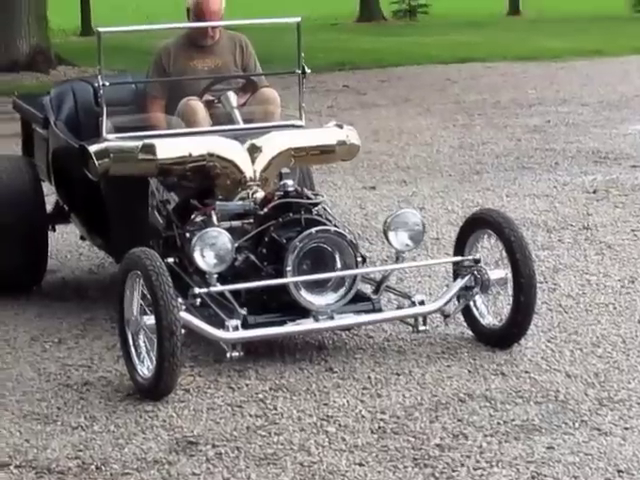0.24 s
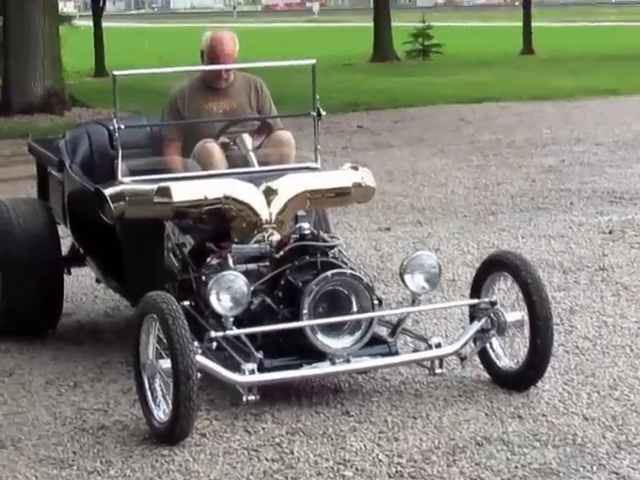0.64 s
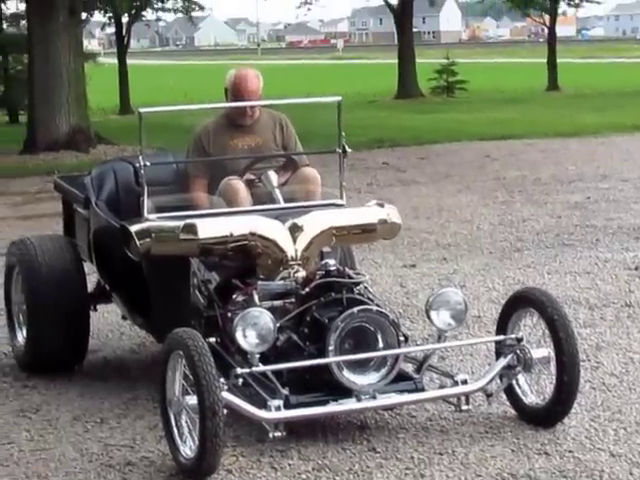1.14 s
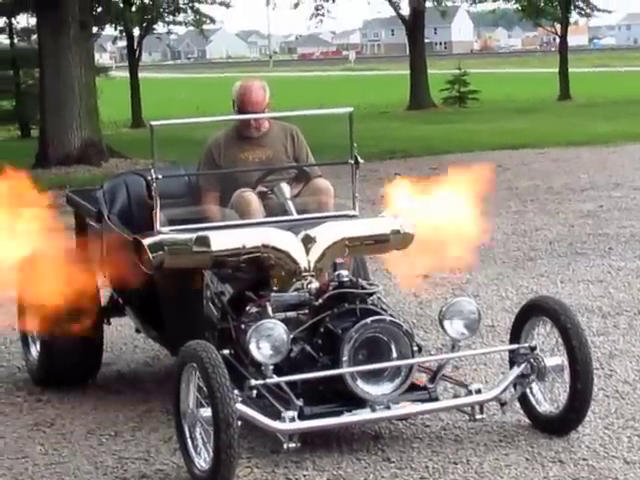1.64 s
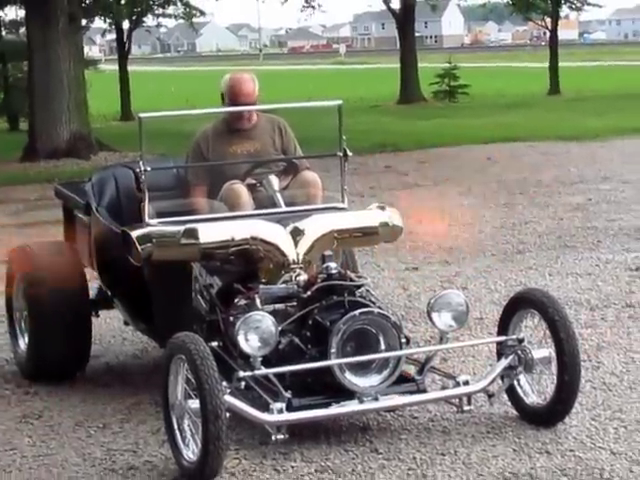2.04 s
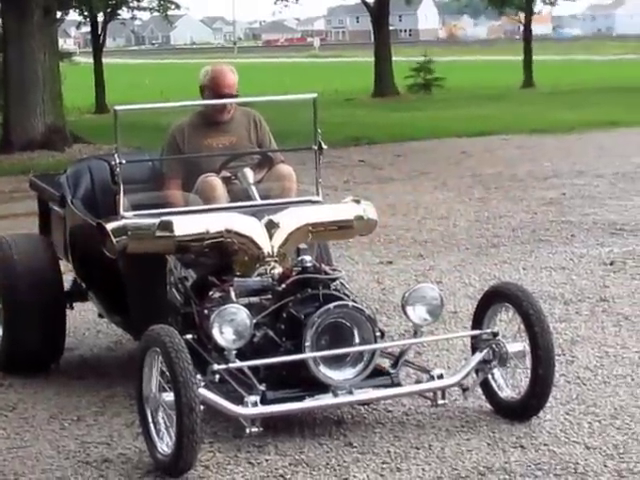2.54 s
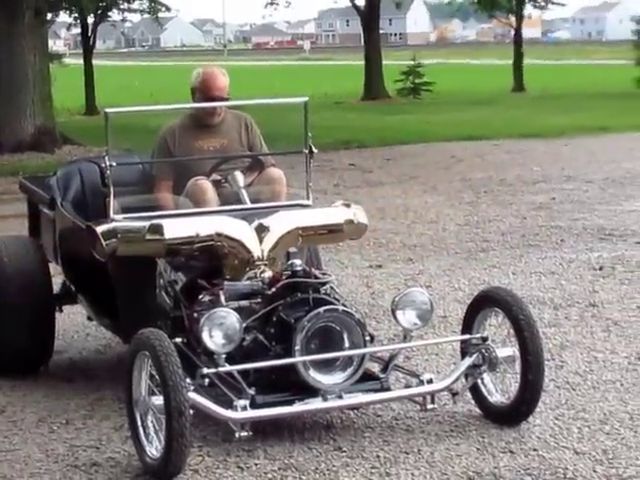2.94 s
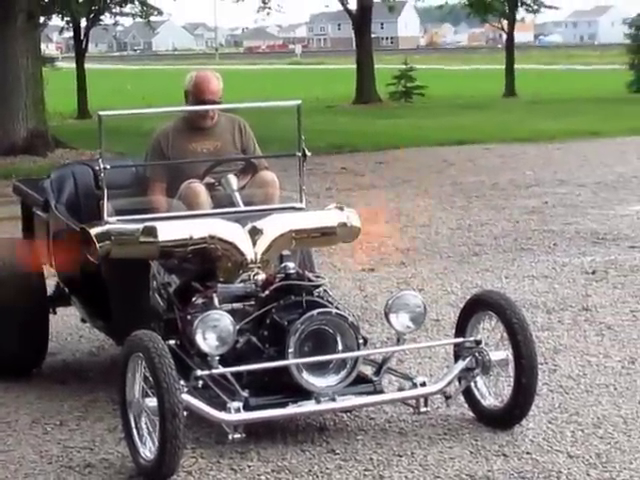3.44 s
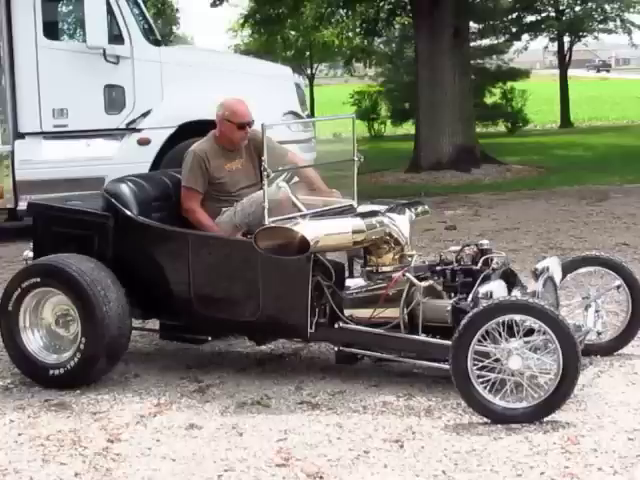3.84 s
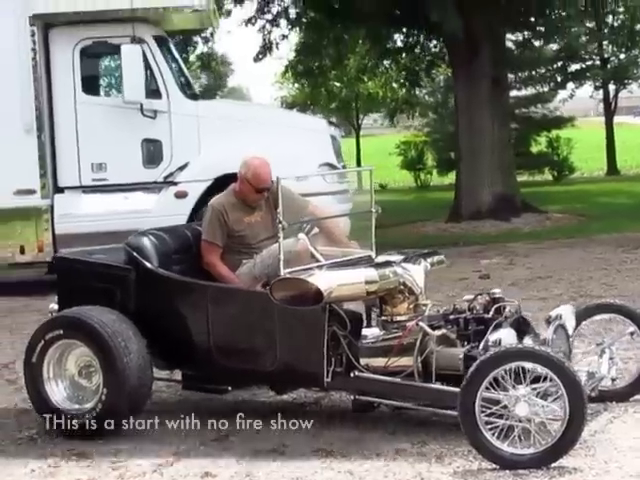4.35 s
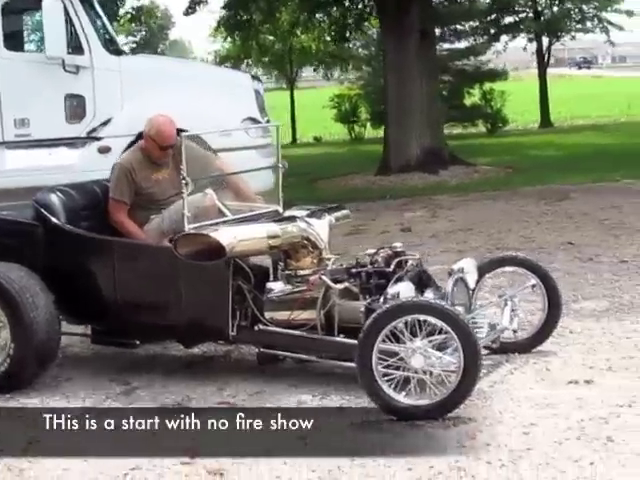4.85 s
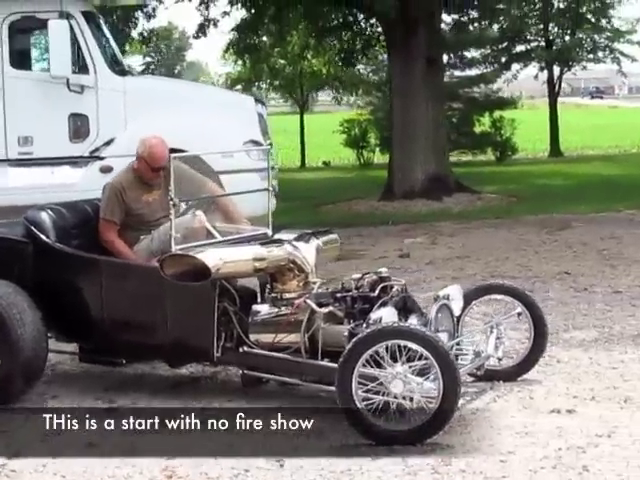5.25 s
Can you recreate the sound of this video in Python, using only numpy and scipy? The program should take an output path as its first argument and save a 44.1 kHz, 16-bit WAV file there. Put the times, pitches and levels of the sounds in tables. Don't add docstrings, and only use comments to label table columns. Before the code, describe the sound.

Turbine whine and booming exhaust, a ragged roar of flame overloading the microphone, then sudden outdoor quiet with switch clicks and a starter winding up.

```python
import sys
import numpy as np
from scipy import signal
from scipy.io import wavfile
from scipy.ndimage import uniform_filter1d

SR = 44100
rng = np.random.default_rng(int(sys.argv[2]) if len(sys.argv) > 2 else 0)


def magnitude_from_level(level_db):
    exponent = np.asarray(level_db, float) / 20
    return 10 ** exponent


def master_out(mix):
    frames = np.transpose(np.atleast_2d(mix))
    ceiling = np.clip(frames, -1, 1)
    pcm = np.round(ceiling * 32767).astype(np.int16)
    wavfile.write(sys.argv[1], SR, pcm)


N = 242991
T = np.arange(N) / SR
SIDE = np.array([[.5], [-.5]])
CHANGE_S = 3.932
LIGHT_S = 1.39
LOW_CUT_HZ = 98

# time in seconds, blade-passing tone in Hz,
# fireball outside the pipes from 0 to 1, thrust in dB.
ENGINE = [(0.0, 2725, 0, 4.5), (0.14, 2653, 0.2, 3), (0.42, 2542, 0.08, 2), (0.84, 2412, 0.12, 2.5),
          (1.14, 2327, 0.12, 2), (1.44, 2255, 0.18, 3.5), (1.56, 2270, 0.64, 6), (1.69, 2360, 0.98, 6),
          (1.96, 2404, 0.86, 9), (2.2, 2459, 0.67, 9), (2.4, 2487, 0.85, 8.5), (2.65, 2528, 0.05, 10.5),
          (2.95, 2579, 0.11, 8.5), (3.2, 2622, 0.21, 10.5), (3.4, 2657, 0.37, 10.5), (3.54, 2762, 0.83, 10),
          (3.68, 2777, 0.17, 12), (3.84, 2915, 0.19, 12.5)]
# frequency in Hz, then the value named in the note.
PORTS = [
    [(45, .97), (140, .99), (240, .96), (400, .78), (1000, .7), (2400, .85), (6000, .85), (12000, .82)],
    [(45, -1.0), (80, -.78), (140, -.48), (240, -.33), (650, -.25), (1600, -.15), (2400, .5), (3600, .15), (8000, -.05)],
    [(45, 4), (140, .4), (400, -1), (1000, -1), (1600, -3), (2400, -2.5), (3600, .3), (6000, .4), (8000, 4), (11000, -1)],
]
YARD_PORTS = [
    [(45, 0.38), (140, 0.49), (240, 0.75), (1000, 0.45), (2400, 0.49), (6000, 0.33)],
    [(45, -6), (80, 1), (140, 0.5), (400, 0), (1000, -0.5), (5000, -1)],
    PORTS[2],
]

# time in seconds, pitch in Hz.
BOOM_HZ = [(0, 152.6), (.14, 138.7), (.3, 144.9), (.46, 151.6), (.62, 150.4), (.8, 138.8), (.86, 142.9),
           (.92, 159.3), (1.0, 138.8), (1.24, 158.2), (1.4, 149), (1.5, 130), (2.5, 150.2), (2.65, 155.5),
           (2.8, 143.5), (2.97, 152.1), (3.2, 135), (3.9, 148)]
# time in seconds, extra level in dB, half length in seconds.
SURGES = [(.13, 13, 0.02), (.2, 8.5, 0.02), (0.244, 14, 0.0051), (.36, -18, 0.017), (.463, 11, 0.028),
          (.52, -5, 0.065), (.6, 4.5, 0.047), (.66, -6.5, 0.029), (.78, 4.5, .021), (.85, 7.5, 0.019),
          (0.921, 7.5, 0.02), (.97, 0, 0.03), (1.01, 3.5, .021), (1.05, -0.5, 0.029), (1.15, -2.5, 0.041),
          (1.19, 8.5, 0.0069), (1.248, 5.5, .03), (1.31, 3.5, 0.022), (1.39, 4.5, 0.0073),
          (1.47, 12, 0.012), (1.505, 22.5, 0.0082), (2.0, 16, 0.013), (2.21, 9, 0.019), (2.28, 10, 0.036),
          (2.65, -3, 0.024), (2.74, -13, 0.029), (2.92, -0.5, 0.061), (3.05, -5.5, 0.044), (3.15, 0.5, .04),
          (3.79, -26, 0.039)]
# frequency in Hz, width in Hz, level in dB.
DUCT = [(251, 31, 5), (414.6, 48, 0), (655, 87, -1.5), (944, 170, -5.5)]

# frequency in Hz, level in dB.
INTAKE = [
    [(2250, -26.5), (2400, -29.5), (2500, -30), (2590, -29.5), (2670, -30), (2760, -26), (2920, -22.5)],
    [(4500, -31), (4650, -24.5), (4850, -26.5), (5050, -23.5), (5280, -25), (5400, -24.5), (5830, -22)],
    [(6750, -42.5), (7100, -39), (7400, -25.5), (7600, -27), (7850, -27.5), (8100, -22), (8750, -24.5)],
    [(11300, -43.5), (11800, -41.5), (12250, -40.5), (12550, -41.5), (13000, -41), (13600, -41), (14500, -39)],
]
# time in seconds, extra level in dB, half length in seconds.
WAVERS = [(.105, -8, 0.038), (.17, -7, 0.026), (.29, 3, 0.11), (.39, 0.5, 0.046), (.55, -10, 0.049),
          (.7, -4.5, 0.11), (.82, -1, .04), (1.15, -4.5, 0.25), (.97, -2, .06), (1.4, 1, 0.059),
          (2.95, -3, 0.032), (3.25, -6, 0.055), (3.43, 8, 0.018), (3.5, 5.5, 0.032), (3.78, 8, 0.033)]
# time in seconds, extra level in dB, half length in seconds.
FALTERS = [(.235, -13, 0.0054), (.745, -14, .014), (.855, -9, 0.0086), (2.4, -0.5, 0.098),
           (2.56, -5, 0.057), (2.65, 1, .05), (2.75, -5.5, 0.045), (2.88, 0, .05), (3.0, -3, 0.17),
           (3.2, -6.5, 0.057), (3.35, -3.5, 0.048), (3.67, -4, 0.025), (3.86, -1.5, .04)]
# time in seconds, extra level in dB, half length in seconds.
GLINTS = [
    [(.1, 3, 0.036), (.6, -1.5, 0.075), (.98, -2, .05), (2.62, 6, 0.18), (2.85, -2.5, 0.056), (3.2, -1.5, 0.054), (3.7, -0.5, 0.097)],
    [(.3, 11, 0.064), (.55, 2, .06), (.72, 3, .05), (.88, -9, 0.048), (1.05, 0, .08), (1.3, -16, 0.11), (1.8, 5, 0.072), (3.2, 4, 0.091)],
]
# time in seconds, eddy strength in dB, half length in seconds.
CALM = [(1.8, -3, .05), (2.55, -7, .06), (2.65, -8, .06), (2.84, 1, .07), (3.05, -4, .05), (3.13, 1.5, .03),
        (3.3, -5, .035), (3.52, 2, .05), (3.7, -4, .04), (3.8, 1.5, .06)]
# time in seconds, peak level in dB, extra level in dB.
BURSTS = [(1.5823, -18, 11), (1.6162, -15, 7), (1.6511, -16, 2), (1.6835, -15, 4), (1.7163, -14, 8),
          (1.7496, -15, 1), (1.8187, -21, -2), (1.8442, -13, 0), (1.8677, -16, 4), (1.9, -16, 1),
          (1.93, -14, 3.5), (1.9584, -14, 3), (2.156, -10, 5), (2.185, -8, 11), (2.2056, 6, 10),
          (2.2547, -10, -3), (2.2862, -10, 5), (2.3256, -8, 10), (2.359, -8, 3), (2.377, -10, 2),
          (2.3949, -10, 2), (2.4135, -10, -3), (2.4372, -8, 9), (2.4902, -15, 0), (2.5101, -10, -2),
          (2.756, -11, 3), (2.8239, -13, -4), (2.8603, -13, 7), (2.9696, -11, 3), (3.0724, -11, -5),
          (3.357, -10, 6.5), (3.3931, -11, 2), (3.4109, -9, 3), (3.4335, -8, 11), (3.5064, -7, 5),
          (3.5436, -8, 9), (3.5643, -7, 9), (3.6156, -8, 3), (3.7145, -9, 3)]

# frequency in Hz, level in dB per Hz.
RUMBLE = [(12, -41), (20, -18), (57, 2.5), (118, 4), (216, -0.5), (249, -12), (304, -14), (330, -17.5),
          (430, -25), (730, -120)]
# time in seconds, extra level in dB, half length in seconds.
THUMPS = [(.6, -4, 0.3), (1.25, 2, .05), (1.39, 4, 0.032), (1.5, 3, 0.033), (1.57, -1.5, 0.04),
          (2.45, -1.5, 0.042), (3.35, 1.5, 0.12), (3.62, -2.5, 0.093), (1.7, -5.5, 0.045), (2.0, 2.5, 0.23),
          (2.26, 0, 0.095), (2.79, 8.5, 0.057), (3.07, 3.5, 0.034), (3.84, 1, 0.041)]
# time in seconds, extra level in dB, half length in seconds.
DEEP_GUSTS = [(.45, -6, .08), (.7, -7, .1), (1.0, -14, .1), (1.35, -9, .1), (1.56, 5, 0.066),
              (1.7, 7, 0.053), (1.86, -5.5, 0.043), (2.1, 2, .1), (2.3, 5.5, 0.059), (2.9, 3, 0.059),
              (3.05, -5, .05), (3.25, -2, 0.12), (3.55, 6, 0.096), (3.7, -12, 0.051), (3.85, 9, 0.048)]
# frequency in Hz, level in dB per Hz.
ROAR = [(120, -67), (220, 20), (330, -3), (800, -3.5), (1150, -1), (1600, 5.5), (2300, -3), (3000, 2.5),
        (5000, -143)]
# frequency in Hz, level in dB per Hz.
HISS = [(1500, -4), (2600, 8.5), (3700, 3), (6000, 3), (12000, -2), (13600, -1), (14600, -20), (15700, -14)]
# time in seconds, peak level in dB.
POPS = [(1.5, -29), (1.531, -30), (1.7075, -32), (1.7793, -32), (1.999, -19), (2.0537, -21), (2.1713, -22),
        (2.2057, -12), (2.253, -31), (2.275, -28), (2.314, -27), (2.357, -28), (2.008, -24), (2.042, -29),
        (1.745, -30), (1.766, -27), (3.4415, -42), (3.5043, -32)]
# frequency in Hz, level in dB per Hz.
POP_TONE = [(300, 16.5), (1500, -4), (4000, 2.5), (9000, 4.5), (14000, -7), (16000, -12)]

# frequency in Hz, level in dB per Hz.
YARD = [(12, -30.5), (20, 11), (85, 4), (186, -3.5), (393, -14), (465, -8), (550, -18), (614, -15.5),
        (1460, -16.5), (12400, -42.5), (15500, -46)]
# time in seconds, peak level in dB, ring pitch in Hz,
# time to fall 60 dB in seconds, left-right difference in dB.
CLICKS = [(3.9513, -21, 6830, 0.021, 0), (3.994, -28.5, 4600, 0.013, 6), (4.015, -32, 4630, 0.015, 0.5),
          (4.059, -20, 5030, 0.0051, 3), (4.123, -36, 5100, 0.012, 1.5), (4.2344, -40, 5080, 0.012, -2.0),
          (4.2894, -52, 5390, 0.012, -0.5), (4.5268, -34, 5000, 0.056, 3), (4.589, -33, 3500, 0.013, -4),
          (4.6027, -28.5, 9500, 0.012, 3), (4.603, -39, 4000, .01, 0), (4.654, -44, 5000, .012, 0),
          (4.88, -26, 13000, .01, -5), (4.871, -28, 2790, 0.023, 0), (4.88, -13.5, 7900, 0.012, -8),
          (4.8805, -21, 3400, 0.0099, -6), (4.911, -21, 3000, 0.03, 3), (4.913, -22, 8800, 0.03, 3),
          (4.887, -28.5, 6470, 0.11, 0), (5.1594, -41, 5420, 0.012, 0.5), (4.7316, -20, 9050, 0.026, 0),
          (4.691, -42, 6000, .012, 0), (4.864, -36, 7500, .05, 0)]
# time in seconds, peak level in dB, left-right difference in dB.
LEVER = [
    (4.4585, -12, .5),
]
# frequency in Hz, level in dB, time to fall 60 dB in seconds.
LEVER_MODES = [(975, -2.5, 0.021), (1750, 9.5, 0.011), (2080, -2, 0.014), (2910, -14, 0.031),
               (3400, -7, 0.018)]
# time in seconds, peak level in dB, pitch in Hz, time to fall 60 dB in seconds.
REBOUND = [
    (4.4982, -28, 3250, .018),
    (4.501, -28, 1660, 0.022),
]
# time in seconds, level in dB.
PUFF = [
    (4.731, -35),
    (4.733, -33),
    (4.829, -49.5),
    (4.855, -53),
]
# frequency in Hz, level in dB per Hz.
PUFF_TONE = [(1180, -57), (2000, -31), (2590, -11), (3040, -4), (3550, -20), (3740, -8), (5650, 1),
             (6480, -7), (8970, -4), (15500, -18)]
# time in seconds, peak level in dB, left-right difference in dB.
RELAY = [
    (4.9152, 0.5, -1.5),
]
# frequency in Hz, level in dB, time to fall 60 dB in seconds.
RELAY_MODES = [(1000, -25, 0.044), (1220, -6, .07), (1930, 9.5, 0.024), (2770, 10.5, 0.024),
               (4390, 5, 0.026), (4840, 5, 0.02), (7100, -12, .1), (8560, -5.5, 0.062), (12100, -16, .07)]
# time in seconds, teeth per second in Hz.
MOTOR = [
    (4.92, 44.4),
    (5.22, 310),
    (5.33, 405),
    (5.4, 472),
    (5.51, 573),
]
# frequency in Hz, width in Hz, level in dB.
HOUSING = [(367, 16, -4.5), (600, 57, -8.5), (813, 17, 3.5), (948, 31, -2), (1280, 96, -9),
           (1840, 10.5, 3.5), (1984, 27, 1), (2150, 46, -8), (2410, 40, -20), (2695, 34, -2.5),
           (3000, 30, -31), (3600, 33, -39), (4160, 49, -17)]
# frequency in Hz, level in dB per Hz.
BRUSH = [(590, -17), (1000, -14), (1550, -12), (1950, -4.5), (3040, -10.5), (6570, -16), (9370, -12.5),
         (12500, -24.5), (14000, -34), (15500, -50)]


def evened(x):
    return x / np.sqrt(np.mean(abs(x) ** 2) + 1e-20)


def read(points, hz):
    f, value = np.transpose(points)
    return np.interp(np.log(hz + 1), np.log(f + 1), value)


def curves(rows):
    s, *columns = np.transpose(rows)
    return [np.interp(T, s, c) for c in columns]


def swells(rows):
    t = T[::64]
    total = sum(db * np.exp(-((t - s) / half) ** 2) for s, db, half in rows)
    return np.interp(T, t, total)


def add(mix, s, sound):
    part = mix[:, round(s * SR):][:, :sound.shape[1]]
    part += sound[:, :part.shape[1]]


def chance(hz, channels=1):
    z = rng.standard_normal((channels, N // 16 + 2, 2)) @ [1, 1j]
    r = np.exp(-2 * np.pi * hz * 16 / SR)
    slow = evened(signal.lfilter([1], [1, -2 * r, r * r], z))
    return np.array([np.interp(T, np.arange(len(v)) * 16 / SR, v) for v in slow])


def noise(spectrum_db, ports, patchy_db, size=1024, in_yard=False):
    first = 39 * SR // 10 if in_yard else 0
    length = N - first if in_yard else 4 * SR
    frames, hz = 4 * length // size + 5, np.fft.rfftfreq(size, 1 / SR)
    a, b, c, d, patches = rng.standard_normal((5, len(hz), frames))
    patches = uniform_filter1d(patches, size=12, axis=0)
    patches = evened(uniform_filter1d(patches, size=10, axis=1))
    same, lead, pan_db = (read(p, hz)[:, None] for p in ports)
    same = np.clip(same, 0, 1)
    left = a + 1j * b
    right = same * left + np.sqrt(1 - same ** 2) * (c + 1j * d)
    right = right * np.exp(-1j * lead)
    z = np.array([left * magnitude_from_level(pan_db / 2), right * magnitude_from_level(-pan_db / 2)])
    z *= magnitude_from_level(spectrum_db(hz)[:, None] + patchy_db * patches)
    x = signal.istft(z, nperseg=size, noverlap=3 * size // 4)[1]
    return np.pad(evened(x[:, :length]), ((0, 0), (first, N - first - length)))


def port(hz):
    return magnitude_from_level(SIDE * read(PORTS[2], hz)) * np.exp(1j * SIDE * read(PORTS[1], hz))


def resonances(modes, hz):
    return sum(magnitude_from_level(db) / np.sqrt(1 + (2 * (hz - f) / width) ** 2) for f, width, db in modes)


def ring(modes, rise_s):
    t = T[:9000]
    x = sum(magnitude_from_level(db - 60 * t / t60) * np.sin(2 * np.pi * (hz * t + rng.random())) for hz, db, t60 in modes)
    x *= np.minimum(t / rise_s, 1)
    return x / abs(x).max()


def crack(hz, t60):
    t = T[:9000][:round(1.5 * t60 * SR) + 200]
    band = signal.butter(2, [hz / 1.5, min(1.4 * hz, .45 * SR)], "band", fs=SR)
    x = signal.lfilter(*band, rng.standard_normal(len(t)) * magnitude_from_level(-60 * t / t60))
    return x / abs(x).max()


def duct_boom():
    hz = curves(BOOM_HZ)[0]
    turn = 2 * np.pi * np.cumsum(hz) / SR
    sway = chance(15)
    sway = sway * abs(sway) ** -.6
    sway = uniform_filter1d(sway.view(float).reshape(1, N, 2), size=330, axis=1) @ [1, 1j]
    tone = evened((sway * port(hz) * np.exp(1j * turn)).real)
    ratio = 1.36
    upper = chance(13.5) * port(ratio * hz) * np.exp(1j * ratio * turn)
    tone = tone + magnitude_from_level(-11) * evened(upper.real)
    fireball = curves(ENGINE)[1]
    return tone * magnitude_from_level(-12 - 29.5 * fireball + swells(SURGES))


def blade_whine(boom):
    hz, fireball, _ = curves(ENGINE)
    lit = np.clip((T - LIGHT_S) / 0.16, 0, 1)
    cold, hot, extra = .12, .68, .12
    turbulence = cold + lit * (hot - cold + extra * fireball) * magnitude_from_level(swells(CALM))
    share = np.clip(turbulence, 0, 1)

    loss_db = lit * -12 * np.exp(-abs(T - LIGHT_S) / 0.24)
    first_db, second_db, third_db, fifth_db = (read(p, k * hz) + loss_db for k, p in zip((1, 2, 3, 5), INTAKE))
    levels_db = [first_db + swells(WAVERS),
                 second_db + swells(FALTERS),
                 third_db + swells(GLINTS[0]),
                 (second_db + fifth_db) / 2 - 6,
                 fifth_db + swells(GLINTS[1]),
                 fifth_db - 4 - 5 * turbulence]

    flutter = evened((chance(9)[0] * np.exp(2j * np.pi * 57.6 * T)).real)
    turn = 2 * np.pi * np.cumsum(hz) / SR
    turn = turn + 0.34 * share * flutter + 0.14 * np.tanh(boom[0] / 0.26)
    turn = turn + .22 * share * chance(130)[0].real * np.sqrt(2)
    throb_db = lit * (2.5 + 3.5 * fireball) * np.minimum(np.roll(flutter, 150) - .5, .5)
    throb_db = throb_db + swells([(s + 0.0036, db, 0.004) for s, _, db in BURSTS]) - 1

    out = np.zeros((2, N))
    for k, db in enumerate(levels_db, 1):
        scattered = .45 * chance(45 + 12 * k) + .89 * chance(120 + 50 * k)
        sway = np.sqrt(1 - share ** 2) + (share + .45 * (k > 4)) * scattered
        sway = sway + (.32 + .06 * lit) * chance(22, channels=2)
        gain = np.sqrt(2) * magnitude_from_level(db + 3.0 + throb_db * min(k + 1, 4) / 4)
        out += gain * (sway * port(k * hz) * np.exp(1j * k * turn)).real
    return out


def accessory_gear():
    shaft = 2 * np.pi * np.cumsum(curves(ENGINE)[0]) / SR
    return np.sin(.5655 * shaft) * magnitude_from_level(-42.0 - 1.38 * T) * (T < LIGHT_S)


def flame_rumble():
    fireball = curves(ENGINE)[1]

    def tone_db(hz):
        return read(RUMBLE, hz) + 10 * np.log10(1 + (LOW_CUT_HZ / (hz + 20)) ** 2)

    rumble = noise(tone_db, PORTS, 2.6, size=4096)
    deep = signal.lfilter(*signal.butter(1, 75, fs=SR), rumble)
    rumble = rumble + deep * (magnitude_from_level(-12 + 14.5 * fireball + swells(DEEP_GUSTS)) - 1)
    hollow = signal.lfilter(*signal.butter(1, (150, 225), "band", fs=SR), rumble)
    rumble = rumble - .6 * fireball * hollow
    ducked_db = 0.19 * np.maximum(swells(SURGES), 0) * (T < LIGHT_S)
    rumble_db = -18 + 2.5 * fireball + swells(THUMPS) - ducked_db
    overtones = noise(lambda hz: 40 * np.log10(resonances(DUCT, hz)), PORTS, 1.5, size=4096)
    return rumble * magnitude_from_level(rumble_db) + overtones * magnitude_from_level(-32.0 + 0.2 * T)


def roar_and_hiss():
    _, fireball, thrust_db = curves(ENGINE)
    roar = noise(lambda hz: read(ROAR, hz), PORTS, 0.46, size=2048)
    hiss = noise(lambda hz: read(HISS, hz), PORTS, 0.24)
    gust = magnitude_from_level((.5 + fireball) * chance(45).real)
    return (roar * magnitude_from_level(-37 + thrust_db) + hiss * magnitude_from_level(-34 + 0.79 * thrust_db)) * gust


def flame_pops():
    flash, t = np.zeros((1, N)), T[None, :3000]
    for s, db in POPS:
        add(flash, s, magnitude_from_level(db - 60 * t / 0.07) + magnitude_from_level(db + 4 - 60 * t / 0.016))
    return flash * noise(lambda hz: read(POP_TONE, hz), PORTS, 3.3, size=512)


def quiet_yard():
    air = noise(lambda hz: read(YARD, hz), YARD_PORTS, 1.0, size=2048, in_yard=True)
    return air * magnitude_from_level(-30 + 0.43 * chance(2.0).real)


def switch_clicks():
    out = np.zeros((2, N))
    for s, db, hz, t60, pan_db in CLICKS:
        add(out, s, crack(hz, t60) * magnitude_from_level(db + SIDE * np.clip(pan_db, -3, 3)))
    return out


def with_ground_scatter(knocks):
    t = T[:6000]
    scatter = rng.standard_normal((2, 6000)) * magnitude_from_level(-60 * t / .2) * (t > .004)
    scatter = signal.lfilter([1], [1, -.45], scatter)
    scatter = scatter / np.linalg.norm(scatter[0])
    return knocks + magnitude_from_level(-8) * signal.fftconvolve(knocks, scatter, axes=1)[:, :N]


def lever_knock():
    out = np.zeros((2, N))
    for s, db, pan_db in LEVER:
        pan = SIDE * pan_db
        add(out, s - .0005, ring(LEVER_MODES, 0.0014) * magnitude_from_level(db + pan))
        add(out, s - .001, crack(7300, 0.09) * magnitude_from_level(db - 19 + pan))
        add(out, s, crack(3800, 0.53) * magnitude_from_level(db - 20.5 + pan))
    for s, db, hz, t60 in REBOUND:
        add(out, s, ring([(hz, 0, t60 * .7)], .001) * magnitude_from_level(db - 2 + SIDE))
        add(out, s, crack(hz, t60) * magnitude_from_level(db - 1 + SIDE))
    return out


def valve_puff():
    air = noise(lambda hz: read(PUFF_TONE, hz), PORTS, 2.3, in_yard=True)
    bleed = magnitude_from_level(-250 * np.maximum(T - PUFF[-1][0], 0))
    return air * magnitude_from_level(curves(PUFF)[0]) * (T > PUFF[0][0]) * bleed


def relay_clunk():
    out = np.zeros((2, N))
    for s, db, pan_db in RELAY:
        pan = SIDE * pan_db
        add(out, s, ring(RELAY_MODES, 0.0016) * magnitude_from_level(db - 5.0 + pan))
        add(out, s, crack(1700, 0.042) * magnitude_from_level(db - 10.5 + pan))
        add(out, s, crack(5400, 0.083) * magnitude_from_level(db - 15 + pan))
    return out


def starter():
    on = T > RELAY[0][0]
    since = np.maximum(T - RELAY[0][0] - .018, 0)
    speed = curves(MOTOR)[0]
    octaves = np.log2(speed / 500)
    whir_gain = np.hypot(magnitude_from_level(-25.5 - 60 * since / 0.56), magnitude_from_level(-27.5 + 11 * octaves))
    brush_gain = np.hypot(magnitude_from_level(-24.5 - 60 * since / 0.42), magnitude_from_level(-38.5 + 2.5 * octaves))

    hz = speed * (1 + 0.015 * chance(19.4)[0].real)
    turn = 2 * np.pi * np.cumsum(hz) / SR
    slack = chance(14)[0]
    teeth = np.zeros((2, N))
    for k in range(1, 13):
        tone = (port(k * hz[on]) * np.exp(1j * k * turn[on])).real
        wear = 0.57 + .5 * abs(np.roll(slack, 4000 * k)[on])
        teeth[:, on] += resonances(HOUSING, k * hz[on]) ** 1.16 * wear * tone
    teeth = teeth * np.clip((T - 5.0) / 0.18, 0, 1)

    chatter = noise(lambda hz: 20 * np.log10(resonances(HOUSING, hz)), PORTS, 0.8, size=2048, in_yard=True)
    whir = (0.91 * chatter + teeth) * whir_gain
    brush = noise(lambda hz: read(BRUSH, hz), YARD_PORTS, 1.2, in_yard=True) * brush_gain
    return (whir + brush) * magnitude_from_level(0.82 * chance(25).real) * on


def scene():
    boom = duct_boom()
    engine = boom + blade_whine(boom) + accessory_gear() + flame_rumble() + roar_and_hiss() + flame_pops()
    knocks = with_ground_scatter(switch_clicks() + lever_knock() + relay_clunk())
    return np.where(T < CHANGE_S, engine, quiet_yard() + knocks + valve_puff() + starter())


def thin_treble(x):
    hz, t, z = signal.stft(x, SR, nperseg=1024)
    hz = hz[:, None]
    blade = np.interp(t, T, curves(ENGINE)[0])
    ragged = 130 * rng.standard_normal(len(t) // 4 + 1).repeat(4)[:len(t)]
    edge = np.where(blade < 2525, 6 * blade, np.maximum(5.28 * blade, 13300)) + ragged
    near_sixth = (abs(hz - 6 * blade - ragged) < 420) & (blade < 2640)
    kept = (hz < edge) | near_sixth | (t > CHANGE_S)
    return signal.istft(z * np.where(kept, 1, magnitude_from_level(-60)), SR, nperseg=1024)[1][:, :N]


def low_pass(x):
    return signal.sosfilt(signal.butter(12, 15680, fs=SR, output="sos"), x)


def record(dry):
    ceiling, knee = magnitude_from_level(-8.5), 110
    over = dry / ceiling
    clipped = ceiling * over / (1 + abs(over) ** knee) ** (1 / knee)
    cut = signal.lfilter(*signal.butter(1, LOW_CUT_HZ, "high", fs=SR), clipped)
    cut = signal.lfilter(*signal.butter(1, 28, "high", fs=SR), cut)
    cut = signal.sosfilt(signal.butter(16, 15700, fs=SR, output="sos"), cut)
    fade_out = abs((CHANGE_S - T) / 0.07) ** 1.3
    fade_in = (T - CHANGE_S) / 0.11
    fade = np.clip(np.where(T < CHANGE_S, fade_out, fade_in), .01, 1)
    return low_pass(thin_treble(cut) * fade)


dry = scene()
out = record(dry)
master_out(out)
```